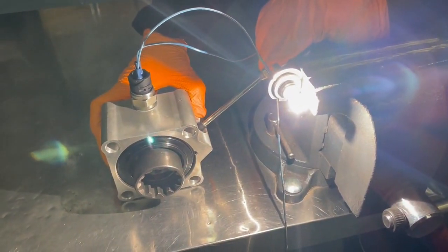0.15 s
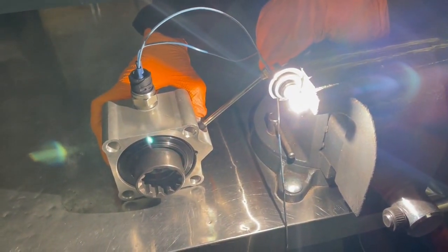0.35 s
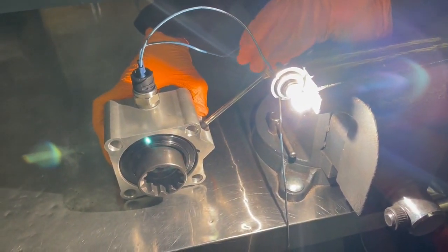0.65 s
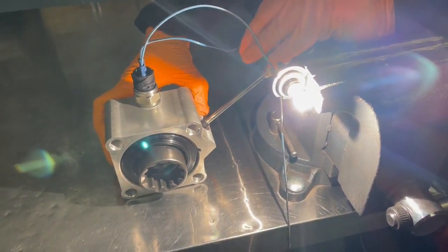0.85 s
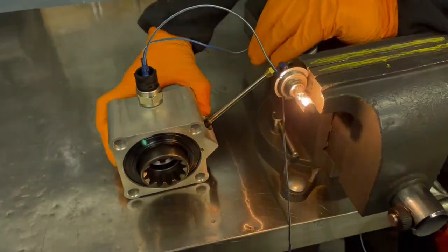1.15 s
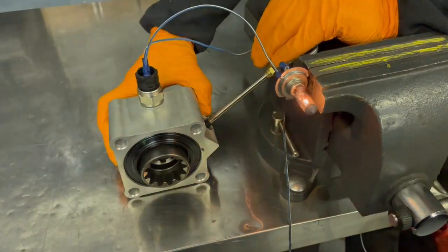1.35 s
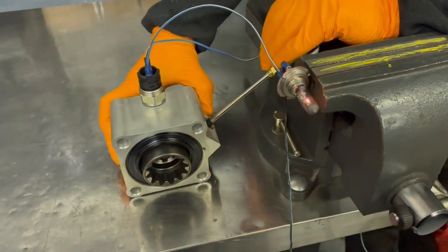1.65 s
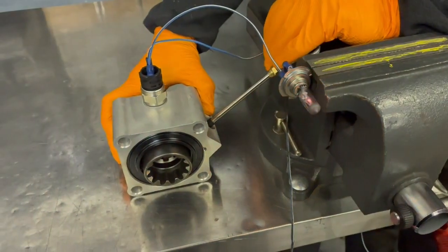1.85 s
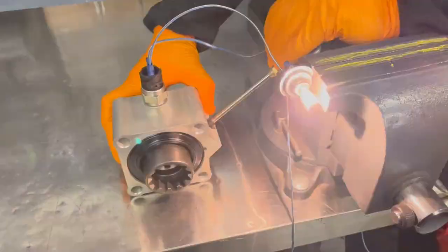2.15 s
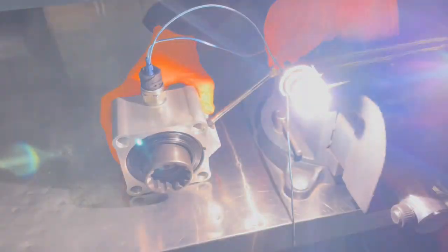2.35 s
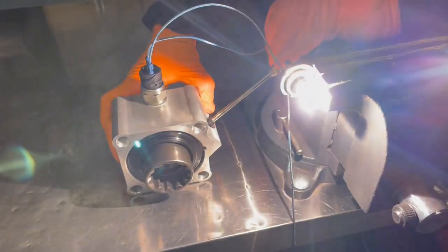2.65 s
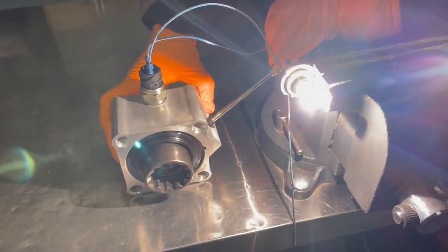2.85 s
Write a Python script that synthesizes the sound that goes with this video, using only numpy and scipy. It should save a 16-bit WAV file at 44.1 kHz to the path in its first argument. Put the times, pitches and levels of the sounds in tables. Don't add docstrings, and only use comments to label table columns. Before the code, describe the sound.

A strong, bright air jet sinks and stops with tiny dull bounces; a faint leak, low hum and one small tick follow, then a hard metallic snap and full hiss, heard close in a small workshop.

```python
import sys
import numpy as np
from scipy import signal
from scipy.fft import rfft, irfft
from scipy.io import wavfile

SR = 44100
rng = np.random.default_rng(int(sys.argv[2]) if len(sys.argv) > 2 else 0)


def generate_wav(sig):
    pcm = np.round(np.clip(np.atleast_2d(sig).T, -1, 1) * 32767).astype(np.int16)
    wavfile.write(sys.argv[1], SR, pcm)


def invert_db(x):
    u = np.asarray(x, float) / 20
    return 10 ** u


N = 132300
HZ = np.fft.rfftfreq(N, 1 / SR)


def in_time(rows):
    return invert_db(np.interp(np.arange(N) / SR, *np.transpose(rows)))


def at_hz(points, warp=np.log):
    hz, value = np.transpose(points)
    return np.interp(warp(HZ + 1), warp(hz), value)


def drift(rate_hz):
    r = np.exp(-128 * np.pi * rate_hz / SR)
    slow = signal.lfilter([1], [1, -2 * r, r * r], rng.standard_normal(N // 64 + 2002))[2000:]
    return np.interp(np.arange(N) / 64, np.arange(len(slow)), slow / slow.std())


# frequency in Hz, share of the direct sound.
LOOSE_SHARE = [(60, 0.029), (250, 0.48), (600, 0.4), (1500, 0.3), (3600, 0.21), (4800, 0.076), (6000, 0.6),
               (12000, 0.39)]


def ports(direct, others, phase, pan):
    half = at_hz(phase, np.abs) / 2
    line_up_hz, steer = 7240, 1.4
    fade = np.where(HZ < line_up_hz, 1, np.clip(steer * abs(np.sin(2 * half)), 0, 1))
    loose = at_hz(LOOSE_SHARE) * fade
    mid = np.cos(half) * direct + loose * others[0]
    side = 1j * np.sin(half) * direct + loose * others[1]
    left_right = [[1], [-1]]
    return (mid + side * left_right) * invert_db(at_hz(pan) / 2 * left_right)


def hiss(colour, whistles, phase, pan, patchy_db, swell_db):
    db = at_hz(colour)
    for hz, width_hz, lift_db in whistles:
        db = db + lift_db / (1 + (2 * (HZ - hz) / width_hz) ** 2)
    white = rfft(rng.standard_normal((3, N)))
    pair = ports(white[0], white[1:], phase, pan) * invert_db(db)
    lowest_hz, highest_hz = colour[0][0], colour[-1][0]
    place = 2 * np.log2(HZ / lowest_hz + 1e-9)
    count = int(2 * np.log2(highest_hz / lowest_hz)) + 1
    swell = swell_db * drift(4)
    out = 0
    for k in range(count):
        share = np.clip(1 - abs(np.clip(place, 0, count - 1) - k), 0, 1)
        flutter = patchy_db * drift(1.7)
        out = out + invert_db(swell + flutter) * irfft(pair * share, N)
    return out / out.std()


# time in seconds, level in dB.
JET_LEVEL = [(0, -25), (.44, -24.5), (.55, -30), (.65, -35), (.72, -42.5), (.9, -45), (1.02, -46.5),
             (1.08, -63), (2.05, -65), (2.09, -30.5), (2.11, -24.5), (2.17, -22), (2.35, -23.5),
             (2.63, -23), (2.72, -25.5), (3, -25.5)]
# frequency in Hz, strength in dB per Hz.
JET_COLOUR = [(600, -30), (1950, -25), (2750, -9), (5500, -5), (7400, -12), (9200, -13), (12500, -10),
              (15400, -10)]
# frequency in Hz, width in Hz, lift in dB.
JET_WHISTLES = [(1550, 300, 5), (3350, 250, 3), (4000, 200, 3), (4490, 45, 8), (6250, 250, 6),
                (9960, 400, 3), (10500, 300, -3), (11500, 800, 5), (4800, 200, -6), (5250, 220, 7),
                (5750, 280, 6), (8400, 800, -7), (14750, 250, -5)]
# frequency in Hz, lead of the left port in radians.
NEAR_PHASE = [(2300, .1), (3500, 2.1), (4600, .9), (5000, -3.4), (5600, -3.4), (6400, -1.2), (8250, -3.14),
              (15050, -9.5)]
# frequency in Hz, left minus right in dB.
NEAR_PAN = [(300, -1), (800, 2), (2400, 0), (4000, 3.5), (5600, 5), (6300, -3), (7100, -3), (8000, 0)]


def jet():
    noise = hiss(JET_COLOUR, JET_WHISTLES, NEAR_PHASE, NEAR_PAN, patchy_db=.8, swell_db=.4)
    return in_time(JET_LEVEL) * noise


# time in seconds, level in dB.
BLEED_LEVEL = [(0, -64), (.45, -43.5), (.72, -37.5), (.85, -36.5), (.97, -35.5), (1.01, -39), (1.07, -54),
               (1.12, -64.5), (2.06, -47.5), (2.1, -31.5), (3, -69)]
# frequency in Hz, strength in dB per Hz.
BLEED_COLOUR = [(1000, -13), (1900, -16), (3500, -6), (5500, -3), (8200, -12), (11300, -3), (12600, -7),
                (15400, -1)]
# frequency in Hz, width in Hz, lift in dB.
BLEED_WHISTLES = [(4600, 700, -4), (5340, 100, 3), (5700, 200, -4), (6250, 450, 3), (9150, 400, 4),
                  (10300, 400, -2), (11000, 400, 4), (11600, 500, 7), (13400, 600, 5), (14800, 300, -4)]
# frequency in Hz, left minus right in dB.
FAR_PAN = [(150, -2.5), (700, 2), (2500, 5.5), (5200, -0.7), (15000, 0)]


def bleed():
    noise = hiss(BLEED_COLOUR, BLEED_WHISTLES, NEAR_PHASE, FAR_PAN, patchy_db=.9, swell_db=.4)
    return in_time(BLEED_LEVEL) * noise


# time in seconds, level in dB.
FAR_LEVEL = [
    (0, -60.5),
    (1.1, -52.5),
    (1.5, -48.5),
    (2.05, -46.5),
    (2.2, -56),
    (3, -81),
]
# frequency in Hz, strength in dB per Hz.
FAR_COLOUR = [(500, -11.5), (2600, -12), (3600, -11.5), (4400, -14), (6400, -4), (7700, -13), (8600, -8.5),
              (15400, -18.5)]
# frequency in Hz, strength in dB per Hz.
RUMBLE_COLOUR = [(15, -36), (25, -8), (54, 9), (123, -3.5), (156, -9.5), (182, -4.5), (350, -13),
                 (381, -17), (1500, -38), (1950, -30), (3300, -120)]
# frequency in Hz, lead of the left port in radians.
FAR_PHASE = [(700, .4), (1300, -.3), (3000, 0), (5000, .1), (5500, -1.4), (6800, -.2), (8050, -3.14),
             (15050, -9.5)]


def workshop():
    motor_hz = 156 + .5 * drift(7.5)
    hum_over_leak_db = -8.5 + 1.2 * drift(12)
    hum = invert_db(hum_over_leak_db) * np.sin(2 * np.pi * np.cumsum(motor_hz) / SR)
    whistles = [(3630, 104, 8.5), (5610, 360, -11), (10850, 820, 5.5), (14300, 420, 9)]
    leak = hiss(FAR_COLOUR, whistles, FAR_PHASE, FAR_PAN, patchy_db=.7, swell_db=.3)
    rumble = hiss(RUMBLE_COLOUR, [], FAR_PHASE, FAR_PAN, patchy_db=.8, swell_db=.4)
    return in_time(FAR_LEVEL) * (leak + hum) + invert_db(-52.5) * rumble


def strike(rows, modes, soft_hz):
    s, db = np.transpose(rows)
    spread_db = rng.normal(0, 1.5, (len(s), len(modes)))
    out = np.zeros(N)
    for k, (hz, level_db, t60) in enumerate(modes):
        clicks = np.full(N, 1e-18)
        np.add.at(clicks, (s * SR).astype(int), invert_db(db + level_db - 6.5 + spread_db[:, k]))
        r = invert_db(-60 / (t60 * SR))
        w = 2 * np.pi * hz / SR
        out += signal.lfilter([0, np.sin(w)], [1, -2 * r * np.cos(w), r * r], clicks)
    low_hz = .75 * min(modes)[0]
    band = signal.butter(2, [low_hz, min(soft_hz, .45 * SR)], "band", fs=SR, output="sos")
    return signal.sosfilt(band, out)


def crack(rows, low_hz, high_hz):
    s, db = np.transpose(rows)
    clicks = np.full(N, 1e-18)
    np.add.at(clicks, (s * SR).astype(int), invert_db(db - 11))
    fade_s = .002
    envelope = signal.lfilter([1], [1, -np.exp(-1 / (fade_s * SR))], clicks)
    burst = envelope * rng.standard_normal(N)
    band = signal.butter(1, [low_hz, high_hz], "band", fs=SR, output="sos")
    return signal.sosfilt(band, burst)


# time in seconds, level in dB.
CREAKS = [
    (.8412, -29),
    (.846, -40),
]
# frequency in Hz, level in dB, time to die by 60 dB in seconds.
LEVER_TONES = [(1400, -9, .012), (2100, -10, .012), (2700, -10, .01), (3300, 0, .012), (4400, -10, .008)]


def trigger():
    return strike(CREAKS, LEVER_TONES, soft_hz=7960)


# time in seconds, level in dB.
DROPS = [
    (.9494, -38),
    (.9503, -38),
    (.9642, -39),
    (.9651, -38),
    (.9785, -39),
    (.9905, -45),
]
# frequency in Hz, level in dB, time to die by 60 dB in seconds.
HOLLOW_TONES = [(940, -12, .02), (1050, -5, .025), (1175, 0, .035), (1330, -8, .02)]


def piston_drop():
    return strike(DROPS, HOLLOW_TONES, soft_hz=2380)


# time in seconds, level in dB.
THUDS = [
    (.978, -45.5),
    (.986, -40),
    (2.103, -28),
    (2.115, -22.5),
    (2.128, -27),
    (2.145, -21.5),
    (2.165, -35.5),
    (2.185, -27.5),
]
# frequency in Hz, level in dB, time to die by 60 dB in seconds.
BENCH_TONES = [(125, -6, .1), (191, -1, .25), (219, -5, .16), (260, -10, .12), (311, -4, .15),
               (486, -8, .02)]


def bench():
    return strike(THUDS, BENCH_TONES, soft_hz=960)


# time in seconds, level in dB.
TICKS = [
    (1.6093, -27),
    (1.6101, -33),
]
# frequency in Hz, level in dB, time to die by 60 dB in seconds.
CONTACT_TONES = [(1300, -12, .012), (2200, -10, .008), (3400, -8, .006), (5000, -8, .005), (6300, 0, .011),
                 (10200, -7, .007), (13000, -12, .005)]


def contact():
    return strike(TICKS, CONTACT_TONES, soft_hz=14000) + crack(TICKS, low_hz=960, high_hz=4350)


def slide():
    start_s, end_s, loudest_db = 2.097, 2.185, -35
    grit = rng.random((80, 2))
    bumps = np.c_[start_s + grit[:, 0] * (end_s - start_s), loudest_db - 12 * grit[:, 1]]
    return strike(bumps, SEAT_TONES + HOUSING_TONES + STOP_TONES[:8], soft_hz=4000)


# time in seconds, level in dB.
KNOCKS = [(2.0995, -25), (2.1058, -14), (2.1066, -14), (2.1074, -16), (2.113, -26), (2.12, -20),
          (2.1208, -22), (2.1255, -27), (2.146, -18)]
# frequency in Hz, level in dB, time to die by 60 dB in seconds.
HOUSING_TONES = [(700, -15, .02), (1185, -3, .026), (1320, 0, .022), (1600, -18, .012), (2040, -5, .018)]


def piston_knock():
    return strike(KNOCKS, HOUSING_TONES, soft_hz=2470) + crack(KNOCKS, low_hz=386, high_hz=2460)


# time in seconds, level in dB.
SNAPS = [(2.1412, -23), (2.145, -20), (2.146, -10), (2.147, -12), (2.152, -15), (2.161, -23), (2.171, -26),
         (2.178, -30)]
# frequency in Hz, level in dB, time to die by 60 dB in seconds.
STOP_TONES = [(2015, -3, .032), (2130, -3, .028), (2230, -4, .024), (2480, -4, .02), (2970, -11, .015),
              (3620, -11, .015), (3900, 0, .026), (4060, -3, .024), (8300, -14, .015)]


def piston_snap():
    return strike(SNAPS, STOP_TONES, soft_hz=9100) + crack(SNAPS, low_hz=960, high_hz=4350)


# time in seconds, level in dB.
REBOUND = [
    (2.166, -21),
    (2.167, -23),
    (2.172, -30),
]
# frequency in Hz, level in dB, time to die by 60 dB in seconds.
SEAT_TONES = [(720, -6, .02), (960, 0, .025), (1150, -4, .025)]


def piston_rebound():
    return strike(REBOUND, SEAT_TONES, soft_hz=2400)


def shop(x):
    t = np.arange(SR // 2) / SR
    t60_s, level_db = .16, -17
    tail = rng.standard_normal(len(t)) * invert_db(-60 * t / t60_s) * (t > .004)
    return signal.fftconvolve(x, invert_db(level_db) * tail / np.sqrt(np.sum(tail ** 2)))[:N]


# frequency in Hz, lead of the left port in radians.
GEARBOX_PHASE = [(100, .1), (600, .6), (3200, 1.3), (4600, .7), (5300, -2.5), (6700, -1.0), (8350, -3.14),
                 (15050, -9.5)]


def gearbox():
    blows = trigger() + piston_drop() + bench() + contact()
    blows = blows + slide() + piston_knock() + piston_snap() + piston_rebound()
    direct = rfft(blows + shop(blows))
    others = rfft([shop(blows), shop(blows)])
    return irfft(ports(direct, others, GEARBOX_PHASE, NEAR_PAN), N)


def scene():
    return jet() + bleed() + workshop() + gearbox()


def low_pass(x):
    return signal.sosfilt(signal.butter(12, 15440, fs=SR, output="sos"), x)


def record(dry):
    cut = signal.ellip(10, .5, 50, 15450, fs=SR, output="sos")
    mix = signal.sosfilt(cut, dry)
    return low_pass(mix)


dry = scene()
out = record(dry)
generate_wav(out)
```